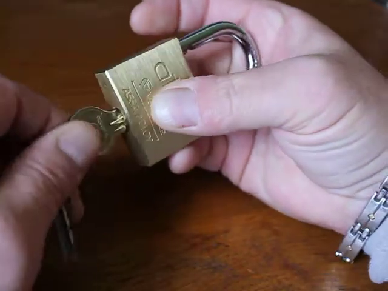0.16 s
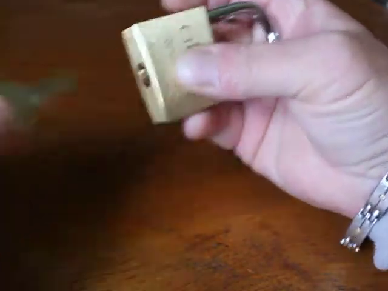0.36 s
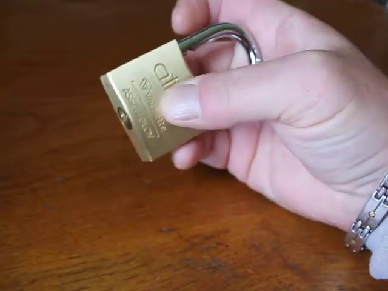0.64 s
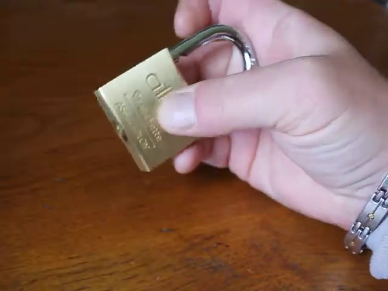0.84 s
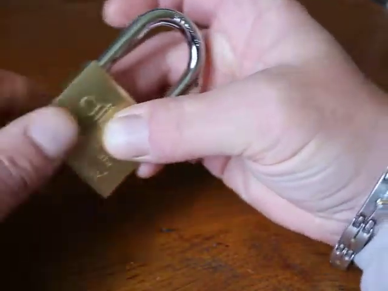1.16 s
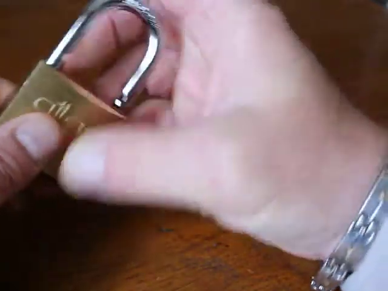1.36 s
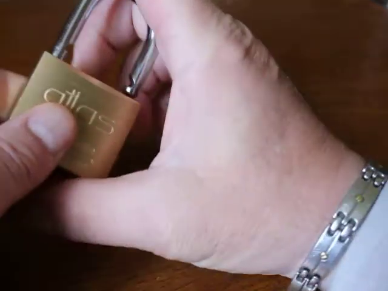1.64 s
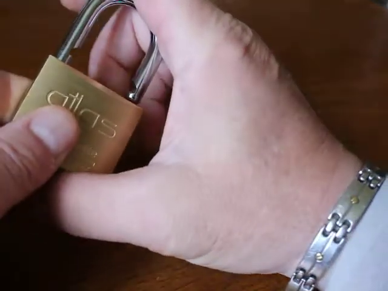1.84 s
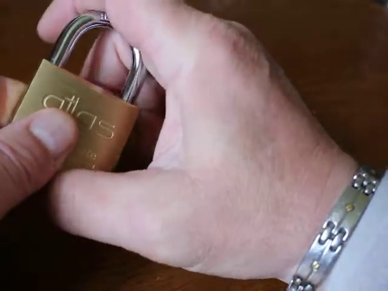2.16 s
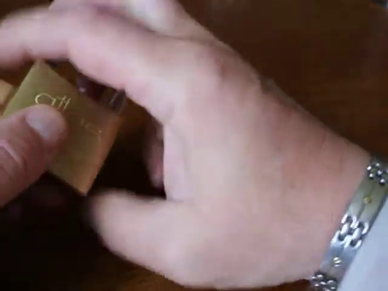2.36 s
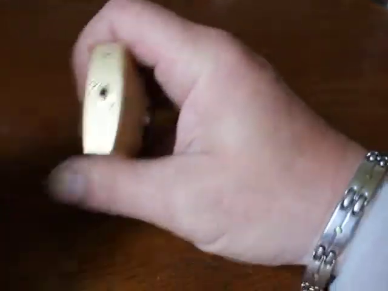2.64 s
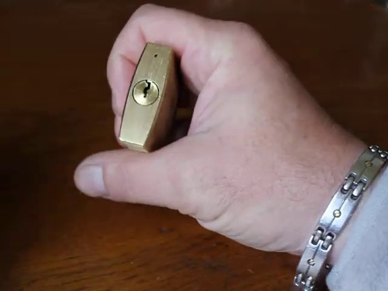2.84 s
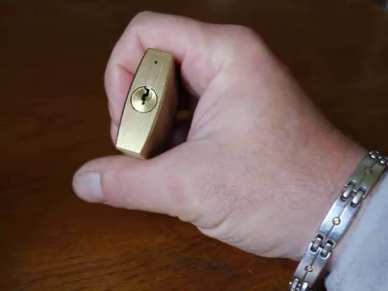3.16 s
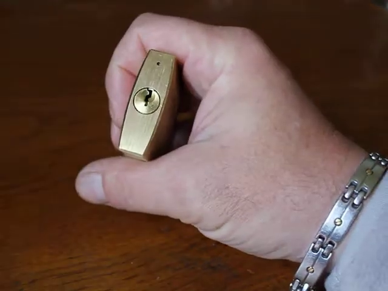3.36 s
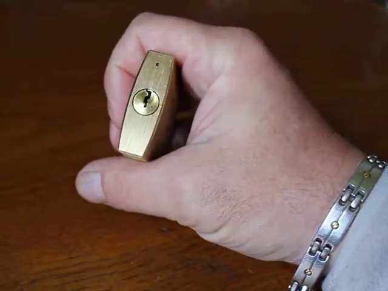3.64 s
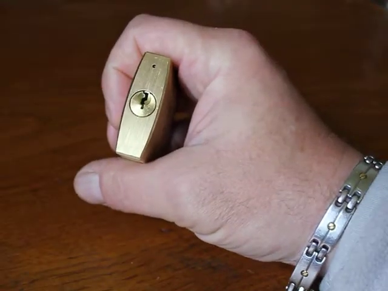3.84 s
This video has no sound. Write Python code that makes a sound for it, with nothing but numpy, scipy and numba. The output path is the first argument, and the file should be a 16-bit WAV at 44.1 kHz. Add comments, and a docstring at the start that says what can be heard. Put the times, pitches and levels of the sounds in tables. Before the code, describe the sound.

Loud padlock snap at the middle, after a quick ratchet of key pins and a bright key jingle on wood. Later, light knocks and dull finger bumps, heard very close in a small room.

```python
"""Keys tick out of a brass padlock's pins and the bunch drops, jingling, on a wooden table.
The shackle is pushed past its latch and snaps shut, so loudly that the recorder's limiter ducks the room.
The lock is stood on the table; fingers bump the wood and drag the keys. Everything is close to one microphone.
Contacts are filtered noise bursts, metal and wood ring as decaying modes, and friction is grainy noise;
diffuse tails give the room around them, over steady air noise and low tones."""
import sys
import numpy as np
from scipy import signal
from scipy.fft import rfft, irfft
from scipy.io import wavfile
from scipy.ndimage import uniform_filter1d, minimum_filter1d
from numba import njit

SR = 44100
rng = np.random.default_rng(int(sys.argv[2]) if len(sys.argv) > 2 else 0)


def bounce(signal):
    """Save signal as a 16-bit WAV file at the path given by the first command-line argument."""
    frames = np.transpose(np.atleast_2d(signal))
    limited = np.clip(frames, -1, 1)
    pcm = np.round(limited * 32767).astype(np.int16)
    wavfile.write(sys.argv[1], SR, pcm)


N = 176400  # samples in the scene
T = np.arange(SR // 2) / SR  # time axis of one event [s]
HZ = np.fft.rfftfreq(4096, 1 / SR)  # frequency axis of the contact spectra [Hz]
EDGE_HZ = 16150  # upper edge of the recorder's band

# Levels are relative to the other layers of a sound unless noted.
# Shackle and latch clicks: (time [s], level [dB], tilt [dB per octave])
LATCH_CLICKS = [(1.9096, 7, 2.5), (1.912, -1, -1.5), (1.98, -18.5, -2.5), (1.998, 5, -1.5),
                (2.0032, -9.5, -3.5), (2.0195, -6.5, -5), (2.043, 9, -3.5), (2.044, 11.5, 5.5),
                (2.0478, 33, 1.5), (2.0519, 26.5, 14.5), (2.054, 11.5, 5), (2.18, -1, 2.5),
                (2.616, -23, -3), (2.974, -24.5, -1), (3.155, -23.5, -1)]
# Contact spectrum of the lock: (frequency [Hz], level [dB])
LOCK_COLOUR = [(40, -30), (200, -33), (648, -16.5), (1200, -17.5), (4290, -3), (4980, -9), (6560, -5),
               (9210, -1), (11200, -3), (13500, -2), (14400, -1), (16000, -23)]
# Ringing parts of the lock: (frequency [Hz], level [dB], decay by 60 dB [s])
LOCK_MODES = [(3480, -58, 0.2), (5450, -41.5, 0.35), (5600, -42, .18), (6970, -50.5, .14),
              (11700, -56.5, .17), (14440, -34, 0.016), (14000, -42, .12), (14300, -45, 0.33)]
# Recoil of the brass body: (frequency [Hz], level [dB], decay by 60 dB [s])
LOCK_THUMP = [(620, -41.5, 0.012)]
LOCK_WIDTH_HZ = 720  # blur of each lock mode
OPENED_DB = -6.5  # the lock still rings faintly from springing open

# Keys striking each other, and a key touching the table at 0.607 s: (time [s], ring level [dB], favoured pitch
# [Hz], chatter level [dB], chatter decay by 60 dB [s])
KEY_CLINKS = [(0.608, -31, 11100, 4.5, .007), (0.6077, -50, 14500, -1, .006),
              (0.7973, -28, 15800, 13.5, 0.024), (.8007, -11, 10500, 13.5, 0.0043),
              (0.8117, -11, 9900, 6, 0.0069), (0.819, -10, 15300, -2, .06), (.839, -8, 10830, -8, .04),
              (.857, -8, 9400, -4, .03), (.8635, -16, 15000, 10, 0.044), (.869, -12, 10580, -1, .04),
              (.88, -16, 14300, -4, .08), (.898, -18, 9330, -3, .01), (0.909, -18.5, 14500, 8, 0.066),
              (0.9396, -20.5, 8970, -12, .01), (0.948, -30, 13600, -6, 0.031), (.956, -38, 15600, -10, .03),
              (.978, -26.5, 10200, -7, 0.011), (.9785, -38, 15300, -11, .04),
              (1.003, -29.5, 11200, -24, .02), (3.931, -42, 11200, -11, .03), (3.95, -46, 15200, -20, .06)]
# Ringing of the keys: (frequency [Hz], level [dB], decay by 60 dB [s])
KEY_MODES = [(7880, -16, .16), (8919, -2.5, 0.12), (8860, -3, 0.099), (10630, -1, 0.17), (10550, -6, 0.088),
             (13550, 1, 0.17), (13860, -5, 0.048), (15560, 1, 0.19)]
# Each contact point favours the modes near one pitch.
FOCUS_DB_PER_OCTAVE, FOCUS_FLOOR_DB = 46, -26

# Metal knocking on the table:
# (time [s], level [dB], tilt [dB per octave], top of the contact's spectrum [Hz])
TABLE_KNOCKS = [(0.3992, -6.5, 0, 11300), (0.475, -15.5, -1.5, 6000), (.492, -9.5, -2, 5800),
                (.607, 6, -1.5, 14100), (0.6119, 1.5, -2, 4800), (.779, 3, 1, 3200),
                (0.7932, -2.5, -7.5, 16000), (0.7949, 1, -4.5, 7060), (0.8009, 11, 5, 15000),
                (0.8121, 6.5, 8, 12000), (0.8191, 0.5, 14, 16000), (0.8296, 5.5, 3, 12000),
                (0.8456, -0.5, -0.5, 9000), (.898, 7.5, 4.5, 12000), (0.9402, 2, -1.5, 12000),
                (.978, 1.5, -0.5, 12100), (1.003, -1.5, -0.5, 10910), (1.03, -10, -1, 7200),
                (1.4004, -17.5, -0.5, 9500), (1.465, -20, -4, 7000), (2.29, -12.5, -1.5, 4900),
                (2.4974, 2, 2, 8000), (2.503, 1.5, 1, 10700), (2.5059, -1.5, -0.5, 10500),
                (3.907, -6.5, 2, 8000), (3.9149, -5, -1, 10000)]
# Contact spectrum of the wood: (frequency [Hz], level [dB])
WOOD_COLOUR = [(59, -43.5), (100, -25), (381, -6.5), (513, -10), (648, -3.5), (1230, -2.5), (2000, -1.5),
               (4200, 1), (10700, -10.5), (16000, -2)]
# Ringing of the table top: (frequency [Hz], level [dB], decay by 60 dB [s])
WOOD_MODES = [(117.8, -58.5, 0.64), (388, -42, 0.044), (1369, -40.5, 0.085), (1643, -40, 0.063),
              (1945, -41, 0.11), (2688, -37, 0.046), (3106, -41.5, 0.11), (3415, -37.5, 0.031)]

# Key ridges flicking the pins: (time [s], level [dB])
PIN_FLICKS = [(0.24, -17), (0.244, -4.5), (0.2483, 0), (0.2517, -7), (0.2616, -5), (0.2647, -1),
              (0.2698, -4), (0.273, -3.5), (0.2765, -0.5), (0.2838, -4), (.287, -4), (.293, -1)]
# Contact spectrum of the pins: (frequency [Hz], level [dB])
PIN_COLOUR = [(590, -68), (1000, -19), (1960, -24), (2150, -8.5), (6630, -10.5), (10400, 0.5), (13600, 2.5),
              (16000, -5)]
# Ringing of the pins: (frequency [Hz], level [dB], decay by 60 dB [s])
PIN_MODES = [(2130, -34, 0.028), (10200, -16.5, 0.0051), (14000, -15, 0.009)]

# Damped clacks of held metal: (time [s], level [dB], pitch [Hz], decay by 60 dB [s])
HELD_CLACKS = [(2.4977, -31, 1060, .08), (2.8838, -25, 484, 0.0053), (2.8842, -27.5, 3060, 0.0053),
               (2.887, -30, 1940, 0.0053), (3.8967, -24.5, 316, 0.015), (3.911, -18.5, 1560, 0.0089),
               (3.9181, -14.5, 3520, 0.0084), (3.931, -20, 3200, 0.014), (3.958, -22.5, 2950, 0.02)]

# Fingers bumping over the table: (time [s], level [dB])
FINGER_BUMPS = [(3.5726, -9.5), (3.6153, -8), (3.6595, -8), (3.783, -7)]
# Contact spectrum of a bump: (frequency [Hz], level [dB])
BUMP_COLOUR = [(47, -40), (80, -17), (189, -5), (306, -10.5), (754, -5.5), (1510, -3.5), (2060, -12),
               (4300, -15), (12000, -29.5), (16000, -66)]
# Each bump rocks and settles: (delay [s], pitch [Hz], level [dB], decay by 60 dB [s])
BUMP_PARTS = [(0, 613, -20.5, 0.021), (.002, 460, -21, 0.023), (.0115, 520, -22, 0.023),
              (.016, 218, -30, .045)]
# Low thuds on the wood: (time [s], level [dB])
LOW_THUDS = [(0.823, -36), (0.929, -51), (1.215, -34.5), (1.255, -39), (3.124, -40.5), (3.899, -25.5)]
# Low ringing of a thud: (frequency [Hz], level [dB], decay by 60 dB [s])
THUD_MODES = [(84.4, -13, 0.14), (110.2, -7, 0.31)]

# Sliding skin and metal:
# (time [s], length [s], level [dB], centre [Hz], width [octaves], grain depth [dB])
RUB_STROKES = [(0.233, 0.082, -32, 12500, 1.9, 2), (0.285, 0.29, -51.5, 12000, 0.55, 0.5),
               (0.356, 0.23, -47, 1540, 0.88, 3), (0.688, 0.096, -44, 1020, 0.65, 2),
               (0.794, 0.22, -33.5, 1980, 1.9, 1.5), (1.058, 0.34, -54, 12300, 0.73, 1.5),
               (1.36, 0.268, -58, 12100, 0.31, 3.5), (1.368, 0.29, -53.5, 1380, 0.72, 2.5),
               (2.359, 0.27, -50.5, 12000, 0.97, 0.5), (2.622, 0.363, -51, 10300, 5.4, 1.5),
               (3.526, 0.077, -55, 4380, 0.017, -1), (3.55, .05, -58, 3870, 0.022, 2),
               (3.586, 0.016, -55, 7400, .03, 0), (3.601, 0.11, -58, 2200, 1.7, 1),
               (3.918, 0.085, -39, 3030, 1.04, 3), (3.924, 0.06, -38, 3550, 0.56, 3),
               (3.921, 0.073, -47.5, 10100, 0.33, 2)]

# Spectrum of the air noise: (frequency [Hz], level [dB])
AIR_COLOUR = [(15, -48), (25, -20.5), (102, -9), (141, -9.5), (263, -1), (326, -21), (354, -6.5),
              (405, -8.5), (451, -11.5), (714, -7), (775, -10.5), (1790, -12), (5280, -23.5), (11900, -25),
              (16000, -27.5)]
AIR_DB = -50.5  # rms level of the air noise
# Steady room tones: (frequency [Hz], rms level [dB])
ROOM_TONES = [(115, -71.5), (211, -67.5), (266, -57.5), (325, -60.5), (411, -67), (572, -64.5),
              (730, -63.5)]
# Decay of the room's tail by 60 dB: (frequency [Hz], time [s])
ROOM_T60 = [(150, 0.18), (1000, 0.456), (4000, 0.26), (8000, 0.26), (15000, 0.16)]

# Limiter: threshold, hold, time constant of recovery, gain reduction at the start
CEILING_DB, HOLD_S, RECOVER_S, START_DUCK_DB = 2.5, 0.12, 0.19, 13.5


def shackle():
    """The latch scrapes past the shackle and snaps home; the loose parts ring on faintly."""
    out = np.zeros(N)
    add(out, 0, amp(OPENED_DB) * buzz(LOCK_MODES, LOCK_WIDTH_HZ))
    for s, db, tilt_db in LATCH_CLICKS:
        click = impact(LOCK_COLOUR, tilt_db, spike_db=-6.5, t60=0.015)
        loose_parts = amp(-9.5) * buzz(LOCK_MODES, LOCK_WIDTH_HZ)
        hit = click + loose_parts + ring(LOCK_THUMP)
        add(out, s, amp(db) * in_room(hit, wet_db=-13.5, top_hz=16000))
    return out


def keys():
    """Tiny bounces chatter at each clink; the keys' high modes ring on, fluttering as the keys touch."""
    out = np.zeros(N)
    for s, ring_db, hz, chatter_db, chatter_t60 in KEY_CLINKS:
        for mode_hz, db, ring_t60 in KEY_MODES:
            flutter_db = 2.5 * slow_noise(len(T), size=300)
            tone = ring([(mode_hz, db, ring_t60)], waver_hz=35)
            add(out, s, amp(ring_db + favour(mode_hz, hz)) * unit(amp(flutter_db)) * tone)
        contact_colour = np.transpose([HZ, favour(HZ, hz)])
        chatter = impact(contact_colour, 0, spike_db=-12.5, t60=chatter_t60, grain_db=7)
        add(out, s, amp(chatter_db) * chatter)
    return amp(-3) * in_room(out, wet_db=-15, top_hz=17000)


def table():
    """Hard knocks on the table top, which radiates well into the room; softer contacts lack treble."""
    out = np.zeros(N)
    for s, db, tilt_db, top_hz in TABLE_KNOCKS:
        hit = impact(WOOD_COLOUR, tilt_db, spike_db=-2, t60=0.034) + ring(WOOD_MODES, waver_hz=13.5)
        hit = lowpass(hit, top_hz, order=3)
        add(out, s, amp(db) * in_room(hit, wet_db=-3.5, top_hz=6650))
    return amp(-0.86) * out


def pins():
    """The sprung pins snap over the ridges of the key as it slides out."""
    out = np.zeros(N)
    for s, db in PIN_FLICKS:
        flick = impact(PIN_COLOUR, 0, spike_db=-7, t60=0.011) + ring(PIN_MODES, waver_hz=120)
        add(out, s, amp(db) * flick)
    return in_room(out, wet_db=-11.5, top_hz=17000)


def clacks():
    """Metal held in the fingers meets the wood: a tick and one quickly damped tone."""
    out = np.zeros(N)
    for s, db, hz, t60 in HELD_CLACKS:
        tone = np.sin(2 * np.pi * hz * T) * fade(t60)
        tick = amp(4.5) * impact(WOOD_COLOUR, -2.3, spike_db=-10, t60=0.01)
        add(out, s, amp(db) * (tone + tick))
    out = signal.sosfilt(signal.butter(2, 110, "high", fs=SR, output="sos"), out)
    return in_room(out, wet_db=-3.5, top_hz=6000)


def hands():
    """Hollow bumps, all with the same response of table and room, and low thuds on the wood."""
    out = np.zeros(N)
    body = amp(-4) * impact(BUMP_COLOUR, 0, spike_db=-21, t60=0.24)
    for delay, hz, db, t60 in BUMP_PARTS:
        add(body, delay, amp(db) * np.sin(2 * np.pi * hz * T) * fade(t60))
    soft_onset = np.minimum(T / 0.0011, 1)
    bump = in_room(body * soft_onset, wet_db=-5.5, top_hz=8000)
    for s, db in FINGER_BUMPS:
        add(out, s, amp(db) * bump)
    slow_onset = np.minimum(T / 0.054, 1)
    for s, db in LOW_THUDS:
        add(out, s, amp(db) * ring(THUD_MODES) * slow_onset)
    return out


def rubbing():
    """Grainy friction that swells and dies with each stroke."""
    out = np.zeros(N)
    for s, length, db, hz, octaves, grain_db in RUB_STROKES:
        size = int(length * SR)
        hiss = noise(lambda f: -12 * np.log10(1 + (np.log2((f + 1) / hz) / octaves) ** 4), size)
        grain = amp(grain_db * slow_noise(size, size=130))
        swell = np.sin(np.linspace(0, 1, size, endpoint=False) * np.pi) ** 0.62
        add(out, s, amp(db) * unit(hiss * grain) * swell)
    return out


def room_tone():
    """Steady air noise with narrow, wavering low tones, each a thin band of noise."""
    air = amp(AIR_DB) * noise(lambda f: read(AIR_COLOUR, f), N)
    hum = np.zeros(N)
    for hz, db in ROOM_TONES:
        hum += amp(db) * noise(lambda f: -20 * np.log10(1 + ((f - hz) / 9) ** 2), N)
    return air + hum


def in_room(x, wet_db, top_hz):
    """Adds a diffuse tail, dull above top_hz, whose decay time depends on frequency."""
    hz, t, z = signal.stft(rng.standard_normal(len(T)), SR, nperseg=256)
    decay = np.exp(-np.log(1000) * t / read(ROOM_T60, hz)[:, None])
    tail = signal.istft(z * decay, SR, nperseg=256)[1][:len(T)]
    tail *= np.minimum(T / 0.0031, 1)  # the diffuse sound takes a moment to build
    tail = lowpass(tail / np.linalg.norm(tail), top_hz, order=2)
    return x + amp(wet_db) * signal.fftconvolve(x, tail)[:len(x)]


def impact(colour, tilt_db, spike_db, t60, grain_db=0):
    """A contact spike and a brief dense rattle of the struck body, with unit energy."""
    grain = amp(grain_db * rng.standard_normal(len(T)))
    rattle = rng.standard_normal(len(T)) * fade(t60) * grain
    rattle /= np.linalg.norm(rattle)
    rattle[0] += amp(spike_db)
    tilt = tilt_db * np.log2(np.maximum(HZ, 200) / 1000)
    gain = amp(read(colour, HZ) + tilt - 30 * (HZ > EDGE_HZ))
    # Folding the cepstrum makes the filter minimum-phase, so the attack stays sharp.
    cepstrum = irfft(np.log(gain))
    cepstrum[1:len(HZ) - 1] *= 2
    cepstrum[len(HZ):] = 0
    response = irfft(np.exp(rfft(cepstrum)))
    hit = signal.fftconvolve(rattle, response)[:len(T)]
    return hit / np.linalg.norm(hit)


def ring(modes, waver_hz=0):
    """Decaying modes struck with random phase; loose contact makes their pitch waver."""
    out = np.zeros(len(T))
    for hz, db, t60 in modes:
        waver = waver_hz * slow_noise(len(T), size=150)
        cycles = np.cumsum(hz + waver) / SR + rng.random()
        out += amp(db) * fade(t60) * np.sin(2 * np.pi * cycles)
    return out


def buzz(modes, width_hz):
    """Modes of loosely seated parts, blurred into decaying bands of noise."""
    out = np.zeros(len(T))
    for hz, db, t60 in modes:
        band = noise(lambda f: -20 * np.log10(1 + (2 * (f - hz) / width_hz) ** 2), len(T))
        out += amp(db) * fade(t60) * band
    return out


def favour(hz, centre_hz):
    """Gain in dB with which a contact point excites each pitch."""
    octaves_off = abs(np.log2((hz + 1) / centre_hz))
    return np.maximum(-FOCUS_DB_PER_OCTAVE * octaves_off, FOCUS_FLOOR_DB)


def noise(shape_db, size):
    """Noise of rms one with a spectrum given as a function of Hz."""
    spectrum = rfft(rng.standard_normal(size))
    return unit(irfft(spectrum * amp(shape_db(np.fft.rfftfreq(size, 1 / SR))), size))


def slow_noise(length, size):
    """Noise of rms one, smoothed over size samples."""
    return unit(uniform_filter1d(rng.standard_normal(length), size=size))


def lowpass(x, top_hz, order):
    """Rolls off the treble above top_hz."""
    return signal.sosfilt(signal.butter(order, top_hz, fs=SR, output="sos"), x)


def fade(t60):
    """Exponential decay by 60 dB in t60 seconds."""
    return np.exp(-np.log(1000) * T / t60)


def amp(db):
    """Decibels to gain."""
    return 10 ** (np.asarray(db) / 20)


def unit(x):
    """Scales to an rms of one."""
    return x / np.sqrt(np.mean(x ** 2) + 1e-20)


def read(points, hz):
    """Reads a table on a log-frequency axis."""
    f, value = np.transpose(points)
    return np.interp(np.log(hz + 1), np.log(f + 1), value)


def add(mix, s, sound):
    """Mixes a sound in at time s, in seconds."""
    part = mix[round(s * SR):][:len(sound)]
    part += sound[:len(part)]


def scene():
    """Everything at one close microphone."""
    foreground = shackle() + keys() + table() + pins() + clacks()
    return (foreground + hands() + rubbing() + room_tone())[None]


@njit
def duck(over_db, start_db, hold, keep):
    """Gain reduction in dB: jumps up with overload, holds, then relaxes."""
    out, now, wait = np.zeros(len(over_db)), start_db, 0.
    for i in range(len(over_db)):
        if over_db[i] > now:
            now, wait = over_db[i], hold
        wait -= 1
        if wait < 0:
            now *= keep
        out[i] = now
    return out


def record(dry):
    """A peak limiter, still recovering at the start; then clipping and the band limit."""
    over_db = 20 * np.log10(abs(dry[0]) + 1e-9) - CEILING_DB
    keep = np.exp(-1 / (RECOVER_S * SR))
    duck_db = duck(over_db, float(START_DUCK_DB), float(HOLD_S * SR), keep)
    # Short look-ahead: a running maximum, then smoothing.
    duck_db = uniform_filter1d(-minimum_filter1d(-duck_db, size=24), size=24)
    limited = np.clip(dry * amp(-duck_db), -1, 1)
    band_limit = signal.firwin(401, EDGE_HZ, window=("kaiser", 8), fs=SR)
    return signal.oaconvolve(limited, band_limit[None], "same")


dry = scene()
out = record(dry)
bounce(out)
```